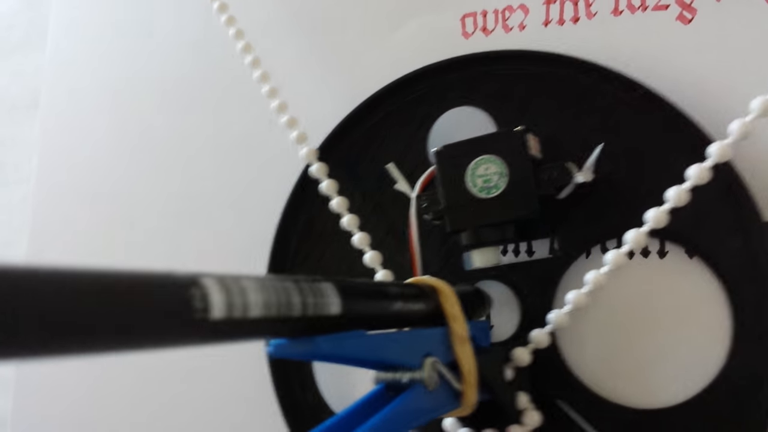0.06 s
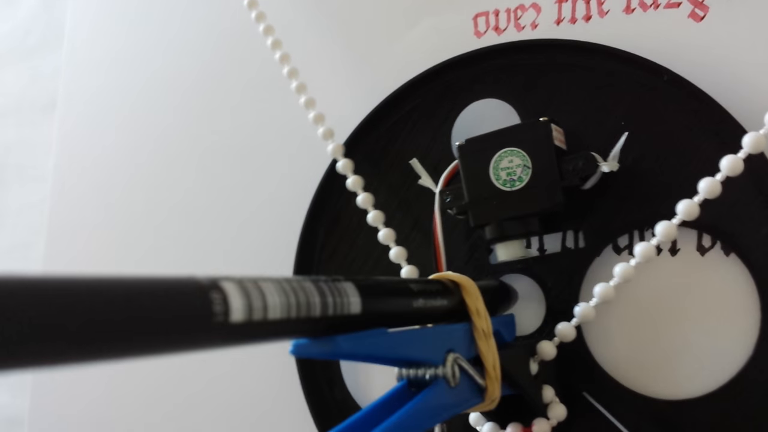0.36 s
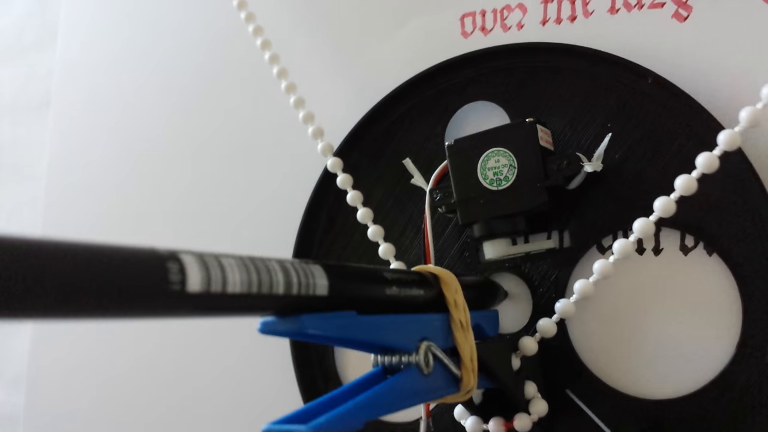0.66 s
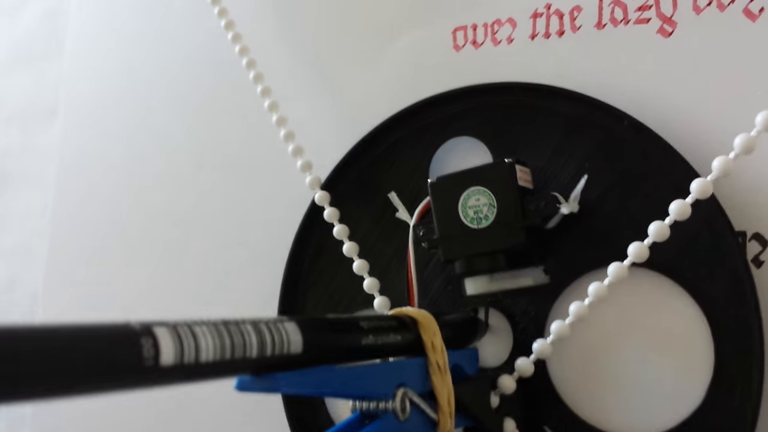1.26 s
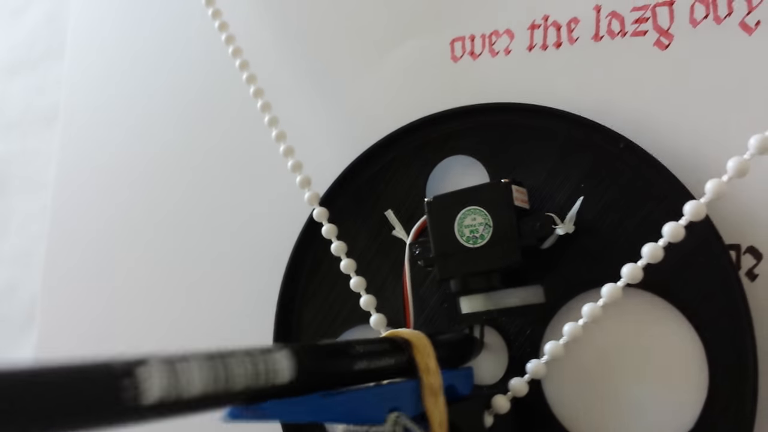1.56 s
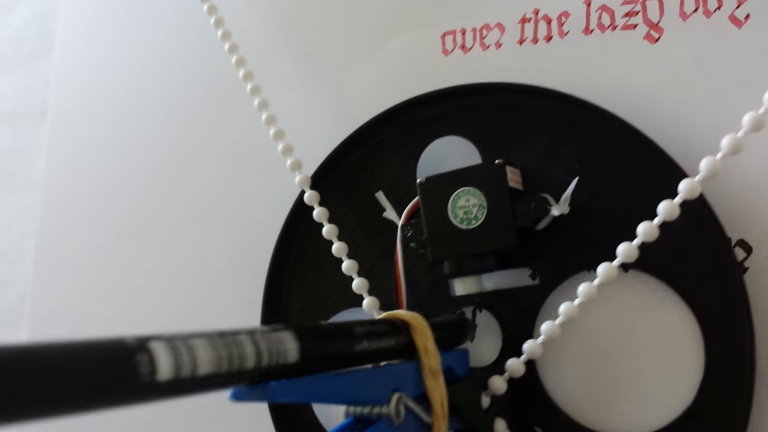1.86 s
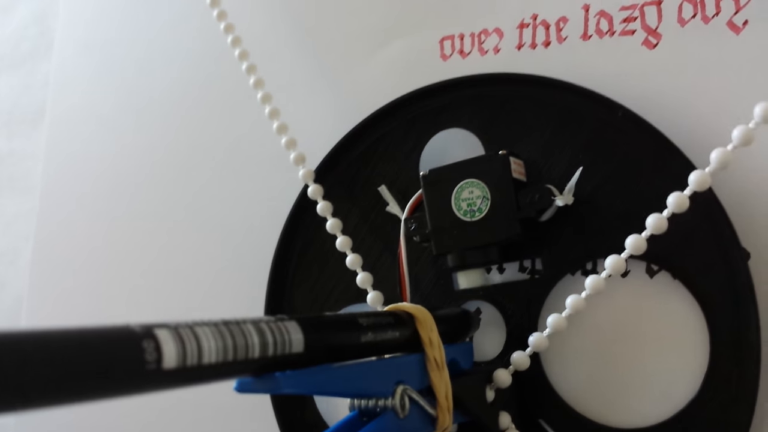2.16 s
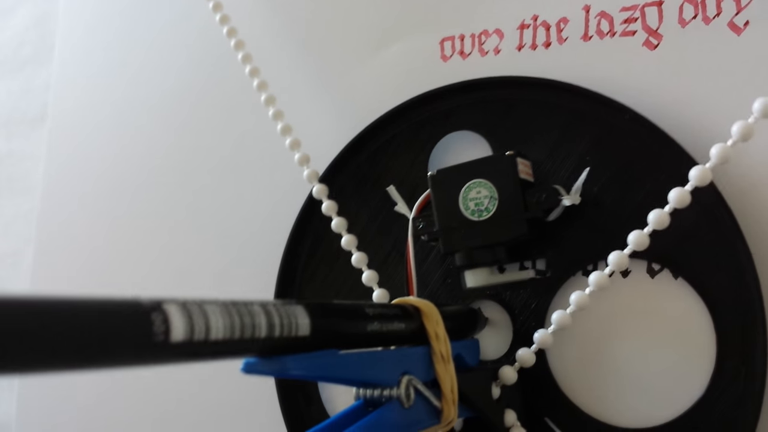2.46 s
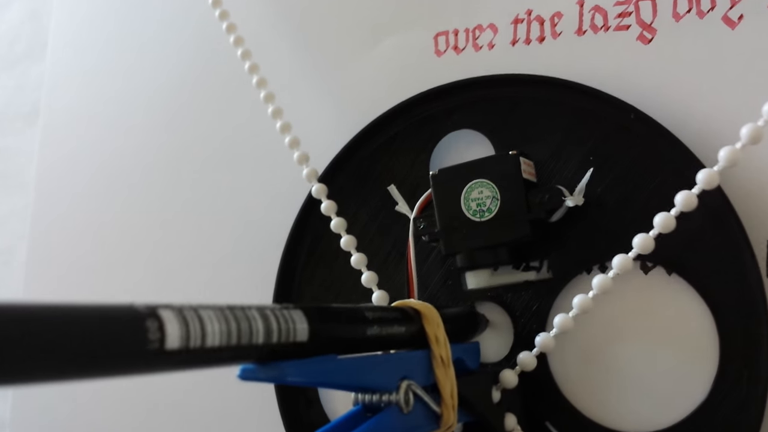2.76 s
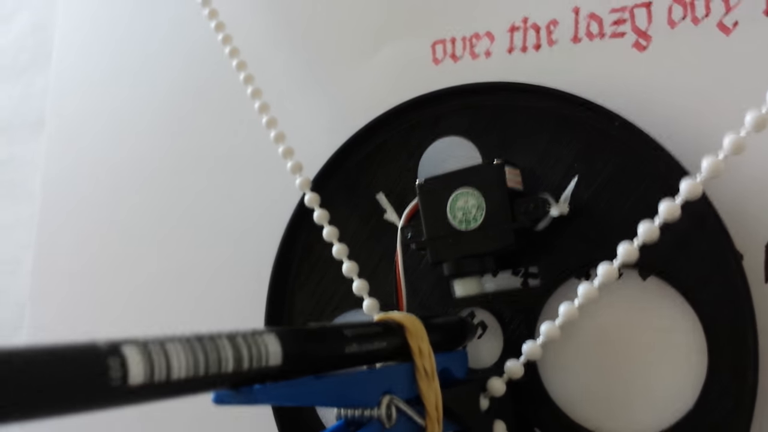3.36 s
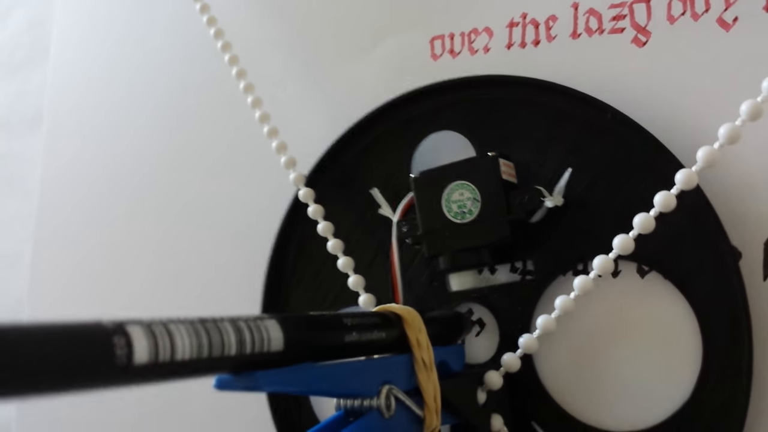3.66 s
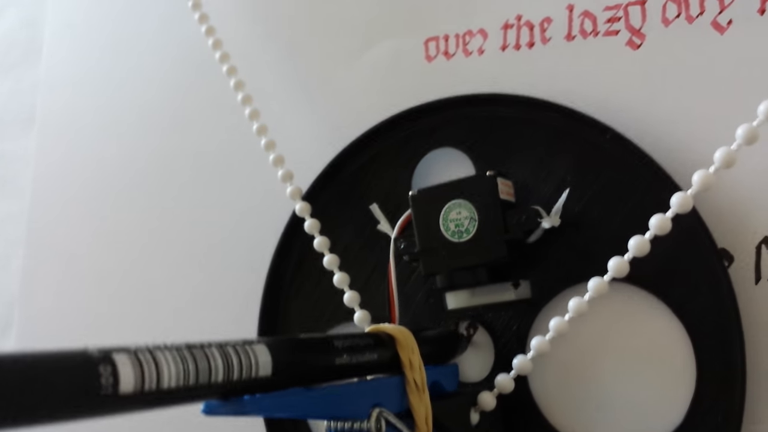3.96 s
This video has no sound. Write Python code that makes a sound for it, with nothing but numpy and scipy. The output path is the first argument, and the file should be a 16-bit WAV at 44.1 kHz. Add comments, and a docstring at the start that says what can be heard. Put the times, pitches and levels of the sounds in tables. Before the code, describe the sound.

A pen plotter draws close by. Its servo whirs and clacks on the right in short bursts at about 0.4, 1.5, 2.2, 3.1 and 3.6 seconds. The pen lands with a soft thump near 0.6, 2.4 and 3.8 seconds. Between the bursts, quieter motors drone in brief, gliding spurts while the nib faintly scratches the paper. A low room hum lies underneath.

```python
"""A small, faintly humming room: a hanging pen plotter draws letters close to a stereo microphone.
Stepper motors drone through the drawing board while the nib scratches the paper.
A hobby servo on the right whirs through its plastic gears to lower and lift the pen,
clacking at the ends of travel; the pen lands on the board with a thump."""
import sys
import numpy as np
from scipy import signal
from scipy.fft import rfft, irfft
from scipy.io import wavfile

SR = 44100
rng = np.random.default_rng(int(sys.argv[2]) if len(sys.argv) > 2 else 0)


def waveform_to_disk(signal):
    """Save audio, clipped to [-1, 1], as 16-bit WAV at the path in sys.argv[1]."""
    frames = np.transpose(np.atleast_2d(signal))
    scaled = np.clip(frames, -1, 1) * 32767
    samples = np.round(scaled).astype(np.int16)
    wavfile.write(sys.argv[1], SR, samples)


N = 176400

# Stepper moves: start_s, end_s, level_db, start_step_hz, end_step_hz, nib_hiss_db
MOVES = [(0.04, 0.293, -36, 163.4, 196.9, -43.5), (0.678, 0.816, -39.5, 159.7, 196.9, -71),
         (0.897, 1.042, -43, 133.5, 152.8, -57), (1.085, 1.165, -39.5, 159.7, 189, -45),
         (1.22, 1.375, -36.5, 175, 157.2, -40.5), (1.367, 1.436, -37, 171.7, 188.8, -41),
         (1.812, 1.909, -40, 203.5, 184.8, -43), (1.888, 2.096, -36, 182.5, 197.7, -45),
         (2.482, 2.575, -41, 207.5, 218.4, -44.5), (2.64, 2.819, -40.5, 160.3, 203.6, -55.5),
         (2.88, 3.03, -41, 135.5, 149.2, -50), (3.39, 3.529, -36.5, 199.1, 177.2, -44.5),
         (3.913, 3.998, -36.5, 189.1, 191, -52.5)]


def undb(db):
    """Decibels to gain."""
    return 10 ** (np.asarray(db) / 20)


def unit(x):
    """Scale to rms 1."""
    return x / np.sqrt(np.mean(x ** 2))


def colour(x, points):
    """Minimum-phase filter from (freq_hz, gain_db) points."""
    hz, db = np.array(points, float).T
    size = 8192
    bins_hz = np.arange(size // 2 + 1) * SR / size
    cepstrum = irfft(np.interp(np.log(bins_hz + 1), np.log(hz), np.log(undb(db))))
    cepstrum[1:size // 2] *= 2
    cepstrum[size // 2 + 1:] = 0
    return signal.fftconvolve(x, irfft(np.exp(rfft(cepstrum))))[:N]


def ring(x, hz, width_hz):
    """One damped mode of unit energy."""
    r = np.exp(-np.pi * width_hz / SR)
    return signal.lfilter([np.sqrt(2 * (1 - r * r))], [1, -r * np.exp(2j * np.pi * hz / SR)], x).imag


def grains(per_s, scatter_db):
    """Tiny random impacts of uneven size."""
    impacts = (rng.random(N) < per_s / SR) * rng.choice([-1, 1], N)
    return unit(impacts * undb(scatter_db * np.clip(rng.standard_normal(N), -2, 2)))


def walk(rate_hz):
    """Random wander, spread near 1."""
    knots = rng.standard_normal(2000)
    return np.interp(np.arange(N) / SR * rate_hz, np.arange(len(knots)), knots)


def gate(start_s, end_s, attack_s, release_s):
    """Linear attack, hold, exponential release."""
    t = np.arange(N) / SR
    return np.clip((t - start_s) / attack_s, 0, 1) * np.exp(-np.maximum(t - end_s, 0) / release_s)


def blows(table):
    """One impulse per (time_s, level_db) row."""
    x = np.zeros(N)
    for time_s, db in table:
        x[int(time_s * SR)] += undb(db)
    return x


def smear(x, decay_s):
    """Spread each impulse into a noisy decay of equal energy."""
    tail = rng.standard_normal(N // 4) * np.exp(-np.arange(N // 4) / SR / decay_s)
    return signal.fftconvolve(x, tail / np.linalg.norm(tail))[:N]


def diffuse(mid, other):
    """Stereo image: shared bass, unrelated treble."""
    side = signal.sosfilt(signal.butter(1, 820, "high", fs=SR, output="sos"), other)
    return np.array([mid + side, mid - side])


def room_tone():
    """Steady air noise and a low wavering hum."""
    # Air spectrum: freq_hz, gain_db
    spectrum = [(25, -42), (55, 1.5), (80, 18), (110, -4), (230, 5), (500, -11.5), (1000, -28), (1500, -18),
                (3000, -20), (14000, -26)]
    air_db, hum_db = -50.5, -58
    mid, side = (unit(colour(rng.standard_normal(N), spectrum)) for _ in range(2))
    hum_hz = 77.8 + 5.47 * walk(10)
    hum = unit(np.sin(2 * np.pi * np.cumsum(hum_hz) / SR) * undb(3.6 * walk(11)))
    return undb(air_db) * diffuse(mid, side) + undb(hum_db) * hum


def reverb(source):
    """The walls return a short, separate tail to each microphone."""
    t60_s, return_db = 0.32, -9.5
    send = colour(source, [(170, 1), (800, -6), (4500, -1), (7400, -9)])
    return undb(return_db) * np.array([smear(send, t60_s / np.log(1000)) for _ in range(2)])


def bead_chain():
    """The bead chain ticks once."""
    # Tick: time_s, strength_db
    ticks = [(1.331, -0.5)]
    return np.array([ring(smear(blows(ticks), 0.003), hz=4100, width_hz=1600) for _ in range(2)]) / 2


def pen_thumps():
    """The pen lands on the board and bounces once."""
    # Landings: time_s, strength_db
    landings = [(0.569, -6), (2.3626, -5), (3.787, -4)]
    # Struck board: mode_hz, width_hz, gain_db
    modes = [(140, 10, -6), (245, 30, -3), (295, 50, -4), (598, 55, -11)]
    bounce_s, bounce_db = 0.01685, -3
    hits = blows(landings) + blows([(s + bounce_s, db + bounce_db) for s, db in landings])
    return sum(undb(db) * ring(hits, hz, width_hz) for hz, width_hz, db in modes) / 2


def nib():
    """The nib hisses along strokes, at times catches in small skips, and squeals faintly."""
    # Friction spectrum: freq_hz, gain_db
    spectrum = [(1000, -5), (2500, -15), (3600, -7), (5000, -2.5), (7000, -3.5), (14000, -16)]
    # Nib catching on paper: start_s, end_s, level_db
    scrapes = [(0.803, 0.825, -40.5), (0.898, 1.04, -47.5), (2.625, 2.817, -50), (2.885, 3.027, -46)]
    # Squeals on fast strokes: start_s, end_s
    squeals = [(1.87, 2.01), (3.40, 3.48)]
    edge_s, catch_s = 0.043, 0.00085
    hiss_left_db, catch_left_db, squeal_db = -8.5, -22, -53
    strokes = sum(undb(db) * gate(start, end - 0.03, edge_s, 0.02) for start, end, *_, db in MOVES)
    strokes *= undb(0.5 * walk(39.3))
    friction = np.array([unit(colour(grains(6000, scatter_db=9), spectrum)) for _ in range(2)])
    hiss = friction * strokes * undb([[hiss_left_db], [0]])
    skips = smear(grains(per_s=390, scatter_db=0.61), catch_s)
    catches = ring(skips, hz=6600, width_hz=3300)
    catches = unit(signal.sosfilt(signal.butter(4, 4800, "high", fs=SR, output="sos"), catches))
    catches *= sum(undb(db) * gate(start, end, catch_s, catch_s) for start, end, db in scrapes)
    squeal = unit(ring(rng.standard_normal(N), hz=5550, width_hz=90))
    squeal *= sum(gate(start, end, edge_s, edge_s) for start, end in squeals)
    return hiss + catches * undb([[catch_left_db], [0]]) + undb(squeal_db) * squeal


def step_pulses(step_hz, jitter=0.03):
    """One pulse per motor step, slightly uneven."""
    steps = np.cumsum(step_hz * (1 + jitter * walk(70))) / SR
    return unit(np.diff(np.floor(steps), prepend=0))


def board_drone(step_hz, effort):
    """Pulses of two motors and the rattle of the drive shake the board."""
    # Board response: freq_hz, gain_db
    response = [(60, -31), (110, -1.5), (180, 9), (330, -9.5), (540, -17.5), (680, -20), (1000, -21.5),
                (1400, -15), (2200, -24), (6000, -53)]
    # Board resonances: mode_hz, width_hz, gain_db
    modes = [(179.8, 8.3, 12), (287, 15, 6), (422.2, 26.4, 11), (506.6, 49, 9.5), (813.4, 11, -2.5)]
    second_ratio, second_db, rattle_db, modes_db = 0.73, -1, 8, -1
    motors = step_pulses(step_hz) + undb(second_db) * step_pulses(step_hz * second_ratio)
    drive = unit(motors + undb(rattle_db) * grains(1500, scatter_db=2.5))
    drive = (drive - drive.mean()) * effort
    ringing = sum(undb(db) * ring(drive, hz, width_hz) for hz, width_hz, db in modes)
    return unit(unit(colour(drive, response)) + undb(modes_db) * unit(ringing)) * np.std(drive)


def steppers():
    """The step rate glides through each move: board drone plus a clean line at that rate."""
    tone_db = -11.5
    t = np.arange(N) / SR
    effort, weighted_hz = np.full(N, 1e-12), np.zeros(N)
    for start_s, end_s, db, start_hz, end_hz, _ in MOVES:
        envelope = undb(db) * gate(start_s, end_s, attack_s=0.0203, release_s=0.029)
        effort += envelope
        weighted_hz += envelope * np.interp(t, [start_s, end_s], [start_hz, end_hz])
    step_hz = weighted_hz / effort
    tone = unit(np.sin(2 * np.pi * np.cumsum(step_hz) / SR)) * effort * undb(tone_db)
    return diffuse(board_drone(step_hz, effort), board_drone(step_hz, effort)) + tone


def place_right(source):
    """The left microphone gets the source late and weaker, with reflections off the board."""
    # Path to the left microphone: freq_hz, gain_db
    far_side = [(1800, -14.5), (3300, -7.5), (4500, -9), (6300, -13), (7400, -26.5), (10000, -14),
                (14000, -27.5)]
    lag_samples, reflections_db = 18, 6
    delayed = np.pad(source, (lag_samples, 0))[:N]
    reflections = undb(reflections_db) * smear(source, decay_s=0.0031)
    return np.array([colour(delayed + reflections, far_side), source])


def servo():
    """Gear teeth rattle the housing, wobbling once a turn; twitches and clacks mark starts and stops."""
    # Arm sweeps: start_s, end_s, level_db, sag_db_per_s, rundown_s, whine_db
    sweeps = [(0.425, 0.715, -20.5, 24, 0.03, -34), (1.518, 1.78, -22.5, -4, 0.0059, 1.5),
              (2.218, 2.494, -19, 29, 0.032, -26), (3.094, 3.325, -22.5, -1.5, 0.016, 3),
              (3.642, 3.919, -21, 24, 0.037, -21)]
    # Gear train twitches: start_s, level_db
    twitches = [(0.0, -21), (0.375, -19), (0.416, -27.5), (1.502, -19), (1.777, -17.5), (1.807, -22.5),
                (2.166, -19.5), (2.208, -28), (3.075, -19.5), (3.347, -14.5), (3.379, -23), (3.588, -20),
                (3.611, -31), (3.63, -34)]
    # Gears taking up their play: time_s, strength_db
    clacks = [(0.3725, -13), (0.4265, 4), (1.503, -8), (1.7765, -2), (2.2175, 5), (3.076, -8), (3.349, -2),
              (3.5885, -11), (3.6402, 5)]
    # Housing response: freq_hz, gain_db
    housing = [(500, -45), (1400, -30), (2100, -34), (2700, -24), (3450, -14), (3900, -16), (4450, -9),
               (5000, -14), (5800, -15), (6900, -8), (7400, 0), (7950, -7), (9400, -10), (9900, -14),
               (10400, -11), (12000, -18), (12900, -18), (14400, -26)]
    # Housing resonances: mode_hz, width_hz
    modes = [(2620, 60), (3110, 50), (3470, 120), (4010, 55), (4450, 130), (6250, 160)]
    teeth_per_s, scatter_db, wobble_hz, wobble_db = 5200, 2, 53.56, 3
    modes_db, clack_gain_db, twitch_s = -9, 14, 0.008
    t = np.arange(N) / SR
    turn_rad = 2 * np.pi * np.cumsum(wobble_hz * (1 + 0.086 * walk(25.74))) / SR
    teeth = grains(teeth_per_s, scatter_db) * undb(wobble_db * np.sin(turn_rad) + 0.62 * walk(250))
    gear_ring = ring(grains(teeth_per_s, scatter_db), hz=7880, width_hz=3000)
    whine = unit(colour(gear_ring, housing))
    ringing = sum(ring(grains(teeth_per_s, scatter_db), hz, width_hz) for hz, width_hz in modes)
    rattle = unit(colour(teeth, housing)) + undb(modes_db) * unit(colour(ringing, housing))
    hits = blows(clacks)
    sound = colour(hits + smear(hits, decay_s=0.0005) / 2, housing) * undb(clack_gain_db)
    for start_s, end_s, db, sag_db_per_s, rundown_s, whine_db in sweeps:
        sag_db = sag_db_per_s * np.clip(t - start_s, 0, end_s - start_s)
        envelope = gate(start_s, end_s, 0.0021, rundown_s) * undb(db - sag_db)
        sound += envelope * (rattle + undb(whine_db) * whine)
    for start_s, db in twitches:
        sound += gate(start_s, start_s + twitch_s, 0.0013, 0.0093) * undb(db) * rattle
    return sound


def scene():
    """Plotter, reverberation and room tone."""
    direct = place_right(servo()) + steppers() + nib() + pen_thumps() + bead_chain()
    return direct + reverb(direct[1]) + room_tone()


def record(dry):
    """The recorder rounds the highest peaks and cuts the top."""
    top_hz = 14800
    return signal.sosfilt(signal.ellip(8, 0.2, 70, top_hz, fs=SR, output="sos"), np.tanh(dry))


dry = scene()
out = record(dry)
waveform_to_disk(out)
```